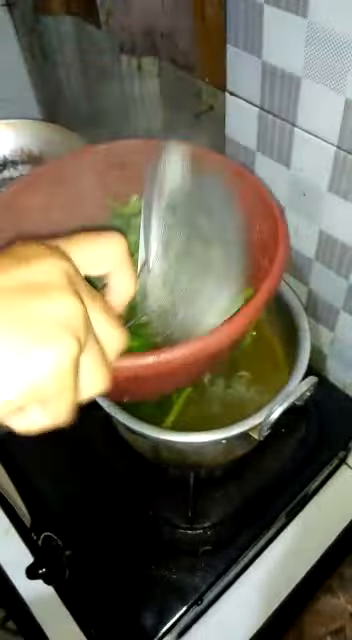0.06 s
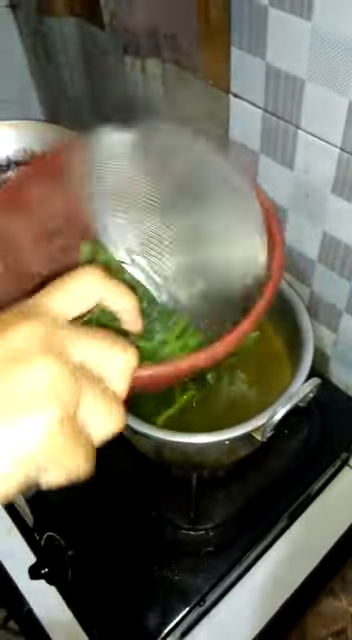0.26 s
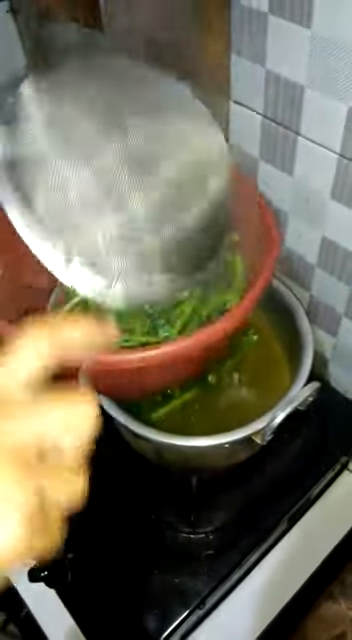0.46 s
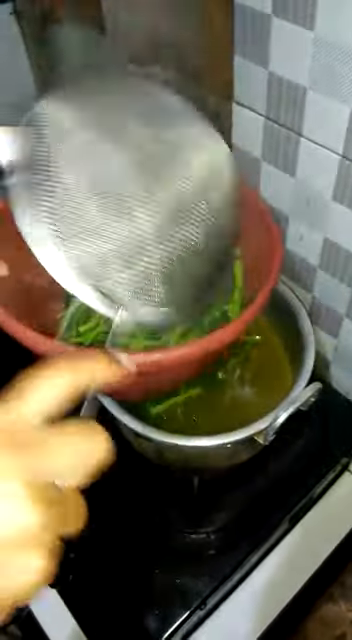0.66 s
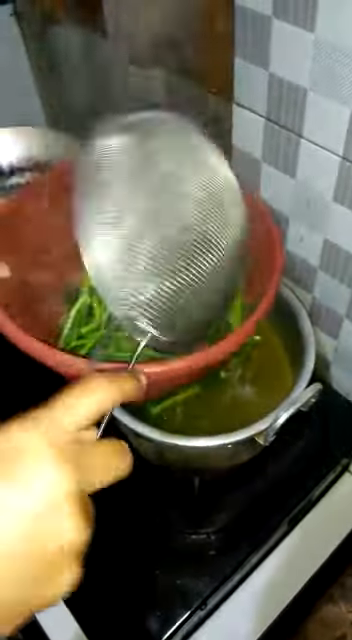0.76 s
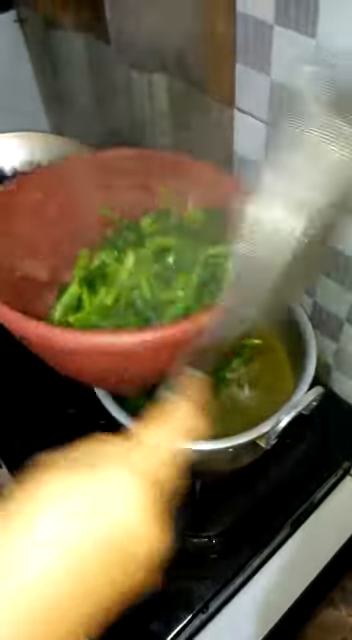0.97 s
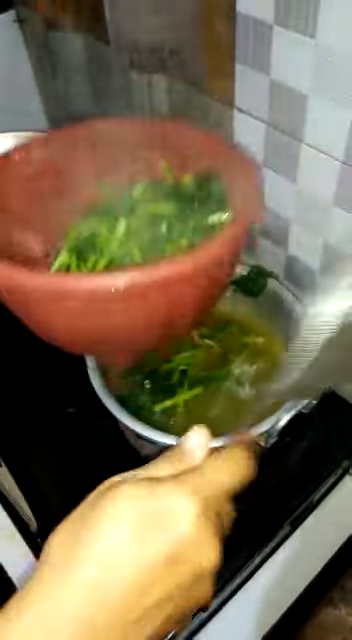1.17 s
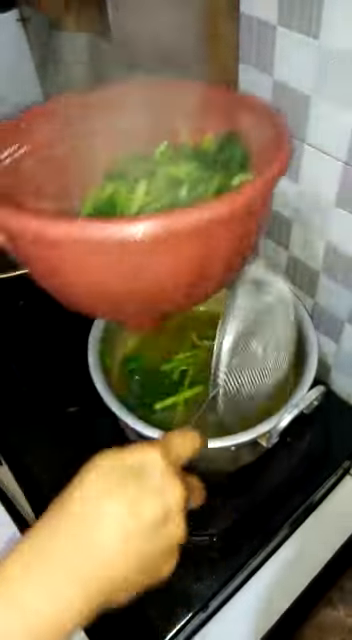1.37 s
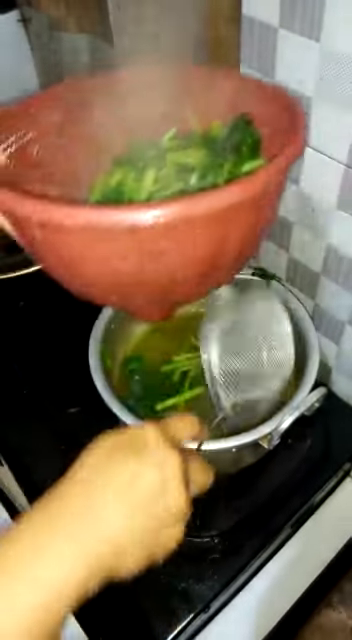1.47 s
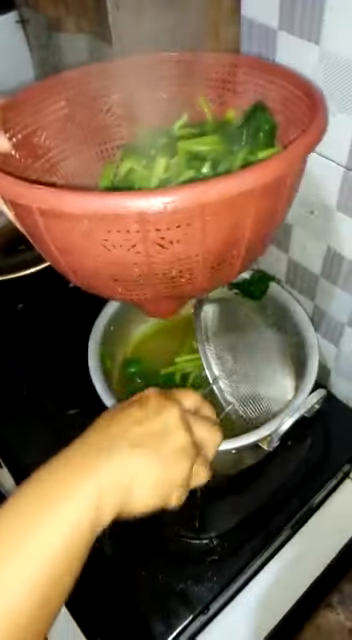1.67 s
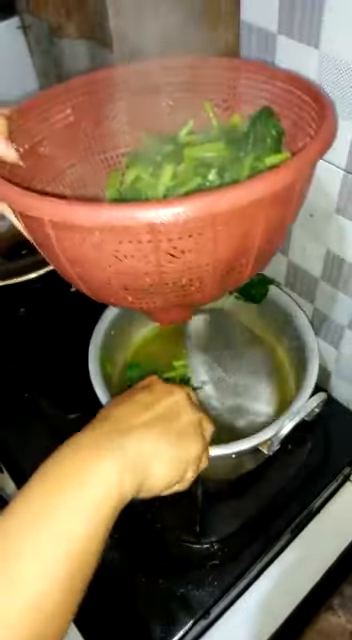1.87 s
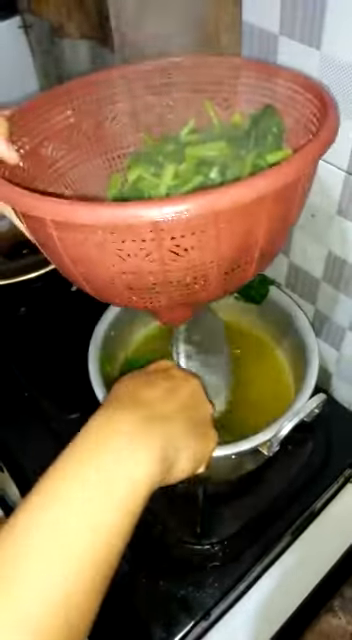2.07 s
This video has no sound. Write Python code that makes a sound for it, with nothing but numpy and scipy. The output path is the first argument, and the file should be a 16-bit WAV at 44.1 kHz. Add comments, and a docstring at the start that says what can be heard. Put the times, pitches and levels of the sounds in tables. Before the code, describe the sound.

A wire mesh strainer raps twice, sharply, on a plastic colander, then clinks against a metal pot, rustles and scrapes along its wall and dips into water with small glugs; close microphone, small tiled kitchen.

```python
"""Knocking out a wire strainer

A wire strainer is knocked twice on a plastic colander to shake out boiled greens, in a small tiled kitchen.
It clinks against a metal pot, scrapes along its wall and dips into the cooking water, which glugs.
Knocks and clinks are decaying sines and noise bursts; the wet mesh rustles and scrapes in random tiny slips.
Glugs are rising tones in narrow noise, with a roughened hum of the pot's air, over quiet coloured noise."""
import sys
import numpy as np
from scipy import signal
from scipy.fft import rfft, irfft
from scipy.io import wavfile
from scipy.ndimage import uniform_filter1d

SR = 44100
rng = np.random.default_rng(int(sys.argv[2]) if len(sys.argv) > 2 else 0)


def store_wav(level_fs):
    """Save 16-bit WAV to argv[1]."""
    pcm = np.round(np.clip(np.atleast_2d(level_fs), -1, 1) * 32767)
    wavfile.write(sys.argv[1], SR, pcm.T.astype(np.int16))


N = 94065  # length of the scene in samples
T = np.arange(N // 3) / SR  # time axis of a single event in seconds

# Colour of the wet wire mesh. Each row: frequency in Hz, level in dB.
MESH_COLOUR = [(500, -56), (1500, -3), (2700, -5), (3700, -11.5), (5000, -10), (7000, -9), (8600, -2),
               (9600, 3.5), (11000, -4), (14000, -10.5)]


def amp(db):
    """Decibels to gain."""
    return 10 ** (np.asarray(db) / 20)


def unit(x):
    """Scales to energy 1."""
    return x / np.sqrt(np.sum(x ** 2) + 1e-20)


def read(points, hz):
    """Reads a spectrum on a log-frequency axis."""
    f, value = np.transpose(points)
    return np.interp(np.log(hz + 1), np.log(f + 1), value)


def add(mix, s, sound):
    """Mixes a sound in at time s."""
    part = mix[max(round(s * SR), 0):][:len(sound)]
    part += sound[:len(part)]


def fade(t, t60):
    """Exponential decay, 60 dB down after t60 seconds."""
    return np.exp(-np.log(1000) * t / t60)


def colour(x, points, size=4096):
    """Causal minimum-phase filter with the given spectrum."""
    log_gain = np.log(amp(read(points, abs(np.fft.fftfreq(size, 1 / SR)))))
    spectrum = np.exp(np.conj(signal.hilbert(log_gain)))
    taps = np.fft.ifft(spectrum).real[:size // 2]
    return signal.fftconvolve(x, taps)[:len(x)]


def even(x, size=64):
    """Flattens the broad humps of a random burst's spectrum and keeps its fine detail."""
    z = rfft(x)
    broad_power = uniform_filter1d(abs(z) ** 2, size)
    return irfft(z / np.sqrt(broad_power + 1e-12), len(x))


def burst(points, t60):
    """Countless close modes, struck together and dying together: fading noise of energy 1."""
    noise = even(rng.standard_normal(len(T)) * fade(T, t60))
    # the slower second fade quiets what the flattening smears late
    return unit(colour(noise * fade(T, 10 * t60), points))


def hump(hz, octaves, skirt_db):
    """Spectrum with one broad peak: a flat top with skirts falling away on both sides."""
    k = 2 ** abs(octaves)
    return [(hz / k ** 2 / 2, 2 * skirt_db),
            (hz / k ** 2, skirt_db),
            (hz / np.sqrt(k), 0),
            (hz * np.sqrt(k), 0),
            (hz * k ** 2, skirt_db),
            (hz * k ** 2 * 2, 2 * skirt_db),
            (SR, 6 * skirt_db)]


def ring(modes):
    """Decaying sines of random phase that build up while the two surfaces touch."""
    contact_s = 0.00027
    waves = 0
    for hz, db, t60 in modes:
        waves = waves + amp(db) * fade(T, t60) * np.sin(2 * np.pi * (hz * T + rng.random()))
    return unit(waves * np.minimum(T / contact_s, 1))


def knocks():
    """The same spot is struck twice: a soft push, a crack, a plastic clack, a short ring and a mesh shake."""
    # Each row: start in seconds, level in dB.
    hits = [(0.5753, -2), (0.7636, -1.5)]
    # Dense, fast-dying modes of the plastic and the mesh. Each row: frequency in Hz, level in dB.
    clack_colour = [(50, -28), (100, -31), (170, -17), (400, -17.5), (800, -6), (1050, 3), (1400, -5.5),
                    (1800, 2), (2200, -4), (2650, -3), (3600, -14), (6000, -18.5), (9500, -32.5),
                    (14000, -25.5)]
    # Sharp crack of the impact. Each row: frequency in Hz, level in dB.
    crack_colour = [(60, -20), (400, -16), (1000, -2.5), (2700, 9), (4000, -5.5), (7000, -17), (9400, 2.5),
                    (11500, -10), (14000, -16)]
    # Soft contact just before each knock. Each row: frequency in Hz, level in dB.
    push_colour = [(40, -5.5), (150, -2.5), (500, 0), (1000, -10.5), (2500, -17), (6000, -48)]
    # Ring of the plastic colander before the grip damps it.
    # Each row: frequency in Hz, relative level in dB, undamped T60 in seconds.
    colander_modes = [(163.5, -12, 0.19), (315.2, -8, 0.25), (459, -16, .18), (597, -2, 0.23),
                      (709, -12.5, 0.51), (780, -9, 0.2)]
    # Ring of the strainer's hoop and handle before the grip damps it.
    # Each row: frequency in Hz, relative level in dB, undamped T60 in seconds.
    strainer_modes = [(905, -2, .28), (941, 0, .2), (1008, -4, .2), (1066, -5, .2), (1120, -6, .15),
                      (1182, -5, .2), (1229, -3, .24), (1415, -6, .2), (1542, -7, .18), (1690, -5, .18),
                      (1818, -1, .2), (1866, -1, .17), (2035, -5, .2), (2428, -3, .15), (2480, 0, .17),
                      (2632, 0, .17), (2783, -4, .15), (2969, -6, .15)]
    ring_db, clack_db, crack_db, shake_db, push_db = -10.5, -5, -8, -14, -25.5  # relative to each knock
    clack_t60, crack_t60, shake_t60, push_t60 = 0.093, 0.012, 0.16, 0.068  # seconds
    grip_t60 = 0.54  # seconds; the hand damps the ring
    crack_lag_s, push_lead_s = 0.0009, 0.00586

    out = np.zeros(N)
    damped_ring = unit(ring(colander_modes + strainer_modes) * fade(T, grip_t60))
    body = amp(ring_db) * damped_ring + amp(clack_db) * burst(clack_colour, clack_t60)
    for s, db in hits:
        add(out, s, amp(db) * body)
        add(out, s + crack_lag_s, amp(db + crack_db) * burst(crack_colour, crack_t60))
        add(out, s + crack_lag_s, amp(db + shake_db) * burst(MESH_COLOUR, shake_t60))
        add(out, s - push_lead_s, amp(db + push_db) * burst(push_colour, push_t60))
    return out


def clinks():
    """Each contact favours a different range of the metal's modes, shakes the mesh and thuds."""
    # Contacts with the pot or the rim. Each row: start in seconds, ring level in dB, main ring in Hz,
    # mesh tick level in dB, mesh rattle level in dB, thud level in dB.
    contacts = [(0.0005, -22.5, 1440, -52, -47, -74), (0.0285, -29, 920, -60, -60, -57),
                (0.0335, -22, 1730, -60, -62, -66), (0.2375, -39.5, 1640, -42.5, -39, -71),
                (0.284, -31.5, 934, -35, -42, -68), (1.3138, -20.5, 1010, -35, -24, -50),
                (1.3156, -23.5, 1560, -26.5, -25.5, -54), (1.3722, -32.5, 1200, -31.5, -30, -62),
                (1.432, -30, 5000, -27, -39, -48), (1.432, -29.5, 2570, -29, -38, -48),
                (1.4537, -22.5, 1237, -24, -26, -35.5), (1.4527, -27.5, 2360, -43, -39, -40),
                (1.6162, -29.5, 1390, -26, -26.5, -39)]
    # Ring of the strainer's rim and the pot before the hand damps it.
    # Each row: frequency in Hz, relative level in dB, undamped T60 in seconds.
    metal_modes = [(773, -15.5, 0.14), (947, 0.5, 0.15), (1033, -0.5, 0.076), (1078, 3.5, 0.073),
                   (1270, -13.5, 0.13), (1318, -7.5, 0.63), (1470, 2.5, 0.1), (1673, 4, 0.083),
                   (1765, -2, 0.48), (1868, 1, 0.17), (2430, -8, .07), (2716, 20.5, 0.037)]
    # Dull thud under each contact. Each row: frequency in Hz, level in dB.
    thud_colour = [(30, -10), (60, -5), (120, -8.5), (250, -1), (550, 8.5), (900, -15), (2500, -44)]
    focus_octaves, skirt_db = 0.27, -18.5
    dense_db, dense_t60 = -5.5, 0.087  # close modes beside the ring, before the hand's damping
    tick_t60, rattle_t60, thud_t60 = 0.029, 0.13, 0.36  # seconds
    damping_cycles = 590  # the grip stops high rings sooner

    out = np.zeros(N)
    for s, ring_db, hz, tick_db, rattle_db, thud_db in contacts:
        focus = hump(hz, focus_octaves, skirt_db)
        focused_modes = [(f, db + read(focus, f), t60) for f, db, t60 in metal_modes]
        metal = ring(focused_modes) + amp(dense_db) * burst(focus, dense_t60)
        damped_metal = unit(metal * fade(T, damping_cycles / hz))
        tick = amp(tick_db) * burst(MESH_COLOUR, tick_t60)
        rattle = amp(rattle_db) * burst(MESH_COLOUR, rattle_t60)
        thud = amp(thud_db) * burst(thud_colour, thud_t60)
        add(out, s, amp(ring_db) * damped_metal + tick + rattle + thud)
    return out


def friction(level, points):
    """Dense tiny slips of uneven size under a level curve."""
    slips_per_s, spread_db = 3600, -1.5
    signs = rng.choice([-1., 1.], N)
    happens = rng.random(N) < slips_per_s / SR
    sizes = amp(spread_db * np.minimum(rng.exponential(1, N), 4))
    grain = unit(colour(signs * happens * sizes, points)) * np.sqrt(N)  # RMS 1
    return grain * amp(np.interp(np.arange(N) / SR, *np.transpose(level)))


def scrape():
    """The rim slips along the pot wall in tiny steps, coloured by the metal."""
    # Each row: time in seconds, level in dB.
    scrape_level = [(0, -62.5), (.09, -68.5), (.2, -73.5), (.29, -66), (.36, -75), (1.3, -75),
                    (1.35, -63.5), (1.58, -71.5), (1.66, -69), (1.77, -64), (1.86, -76), (1.93, -62.5),
                    (2.02, -66), (2.055, -51.5), (2.08, -55), (2.11, -49.5), (2.13, -56)]
    # Each row: frequency in Hz, level in dB.
    wall_colour = [(40, -10), (150, -12), (330, -7.5), (600, -2.5), (1200, 6.5), (1900, -2.5), (2550, 1),
                   (3100, -12), (5000, -27), (12000, -61.5)]
    return friction(scrape_level, wall_colour)


def rustle():
    """The wet mesh rubs in tiny slips whenever it moves."""
    # Each row: time in seconds, level in dB.
    rub_level = [(0, -80), (.13, -73.5), (.22, -83), (.245, -68.5), (.3, -61.5), (.37, -85), (.55, -79.5),
                 (.94, -87), (1.02, -69), (1.11, -92), (1.3, -90), (1.335, -63), (1.41, -62), (1.48, -62),
                 (1.55, -73), (1.61, -76), (1.63, -59.5), (1.75, -59), (1.81, -67.5), (1.875, -72),
                 (1.93, -61), (2.02, -65), (2.05, -55.5), (2.13, -57)]
    return friction(rub_level, MESH_COLOUR)


def water():
    """A glug is a rising bubble tone in a cluster of smaller ones, made of narrow-band noise."""
    # Glugs of the cooking water. Each row: start in seconds, length in seconds, level in dB, centre frequency
    # in Hz.
    glugs = [(0.349, 0.13, -76, 420), (0.452, 0.13, -76, 820), (0.951, 0.081, -64, 604),
             (0.949, 0.093, -63.5, 990), (1.778, 0.034, -60, 372), (1.787, 0.027, -57.5, 1097),
             (1.883, 0.041, -56.5, 1186), (1.894, 0.022, -52, 640), (1.915, 0.019, -51, 646),
             (1.899, 0.072, -61.5, 177), (1.931, 0.058, -59, 310), (1.92, 0.085, -59.5, 848)]
    width_octaves, skirt_db = 0.19, -11.5
    tone_db = 1  # bubble tone relative to the cluster
    rise = 0.24  # pitch rise over the glug as a share of its centre frequency

    out = np.zeros(N)
    for s, length, db, hz in glugs:
        u = np.minimum(T / length, 1)
        swell = np.sin(np.pi * u ** 0.48)  # peaks early in the glug
        noise = colour(rng.standard_normal(len(T)), hump(hz, width_octaves, skirt_db))
        cluster = unit(swell * noise)
        pitch = hz * (1 + rise * (u - .5))
        bubble = unit(swell * np.sin(2 * np.pi * np.cumsum(pitch) / SR))
        glug = unit(cluster + amp(tone_db) * bubble)
        add(out, s, amp(db) * np.sqrt(length * SR) * glug)
    return out


def hollow():
    """The air in the pot hums briefly; small random pitch wavering roughens the hum."""
    # The water wakes the hollow of the pot. Each row: start in seconds, level in dB.
    booms = [(.375, -40), (.465, -44), (0.989, -35.5), (1.743, -41), (1.791, -25.5), (1.895, -20.5),
             (1.936, -18)]
    hum_hz, hum_t60, rise_s = 441, 0.24, 0.019
    waver_hz, waver_s = 14, 0.012  # RMS pitch deviation, smoothing time

    swell = np.zeros(N)
    for s, db in booms:
        add(swell, s, amp(db) * unit(np.minimum(T / rise_s, 1) * fade(T, hum_t60)))
    jitter = uniform_filter1d(rng.standard_normal(N), round(waver_s * SR))
    waver = np.sqrt(N) * unit(jitter)
    return swell * np.sin(2 * np.pi * np.cumsum(hum_hz + waver_hz * waver) / SR)


def room_tail(size=256):
    """A diffuse noise tail from the tiled walls, each band dying at its own speed."""
    # Each row: frequency in Hz, T60 in seconds.
    band_t60 = [(100, 0.12), (400, 0.35), (1000, 0.48), (3000, 0.53), (9000, 0.53), (14000, 0.35)]
    # Each row: frequency in Hz, level in dB.
    wall_colour = [(100, 9), (500, -3.5), (2000, -11), (5000, -10), (10000, -8), (14000, -4)]
    onset_s = 0.0046
    hz, t, z = signal.stft(rng.standard_normal(SR), SR, nperseg=size)
    decay = fade(t, read(band_t60, hz)[:, None])
    tail = signal.istft(z * decay, SR, nperseg=size)[1]
    onset = np.minimum(np.arange(len(tail)) / SR / onset_s, 1)
    return colour(unit(tail * onset), wall_colour)


def kitchen(x, count=3):
    """Tiled-room reverberation: the sound turns steadily through several noise tails,
    so similar hits get different reflections."""
    turn_s = 0.56  # time for one round of the tails
    turn = np.arange(N) / SR / turn_s
    share = np.maximum(np.cos(2 * np.pi * (turn - np.arange(count)[:, None] / count)), 0)
    share /= np.linalg.norm(share, axis=0)  # constant power
    return sum(signal.fftconvolve(x * part, room_tail())[:N] for part in share)


def background():
    """Steady coloured noise lies quietly under everything."""
    # Each row: frequency in Hz, level in dB.
    floor_colour = [(25, -16), (55, 7.5), (90, -8.5), (150, -0.5), (230, -8.5), (430, 8), (620, 0),
                    (850, 10.5), (1250, -27), (1800, 8), (2600, 2), (3500, -11), (7000, -19.5), (9500, -38),
                    (14000, -25.5)]
    floor_db = -74  # RMS
    return amp(floor_db) * np.sqrt(N) * unit(colour(rng.standard_normal(N), floor_colour))


def scene():
    """All sources in the kitchen over a quiet background; mainly the treble spreads sideways."""
    # Side level of the room and background. Each row: frequency in Hz, level in dB.
    side_colour = [(100, -59.5), (2800, -61), (4500, -27.5), (7000, -0.5), (10000, -2), (14000, -1.5)]
    direct = knocks() + clinks() + water() + rustle() + scrape()
    floor = background()
    mid = direct + kitchen(direct) + hollow() + floor
    side = colour(kitchen(direct) + floor, side_colour)  # fresh tails, unlike those in the middle
    return np.array([mid + side, mid - side])


def record(dry):
    """A linear-phase low-pass limits the band."""
    edge_hz = 14300
    taps = signal.firwin(255, edge_hz, window=("kaiser", 7), fs=SR)
    return signal.oaconvolve(dry, taps[None], "same")


dry = scene()
out = record(dry)
store_wav(out)
```